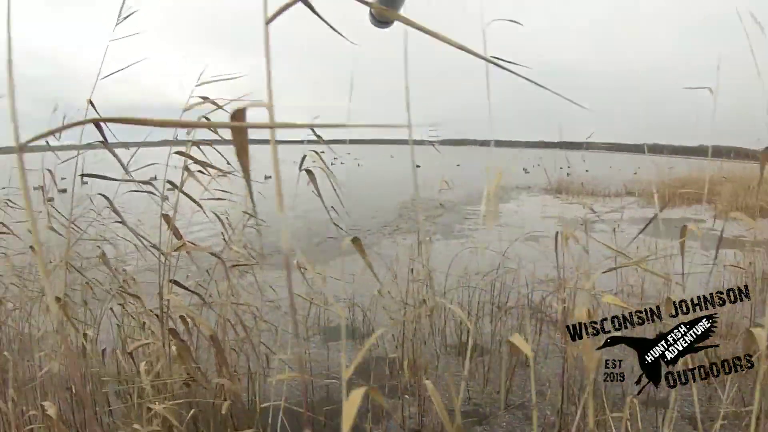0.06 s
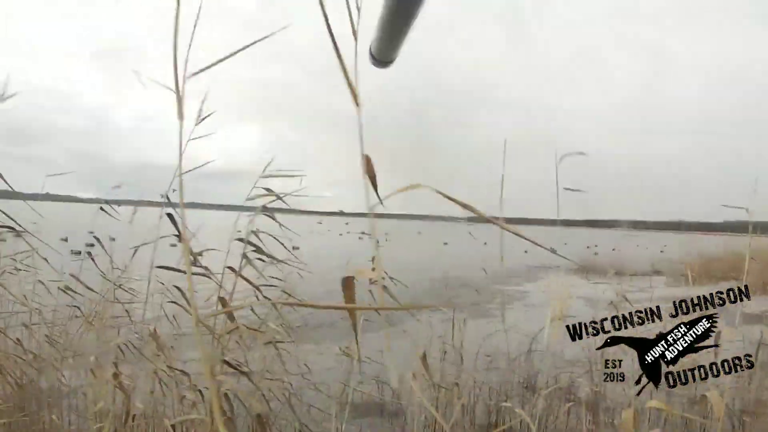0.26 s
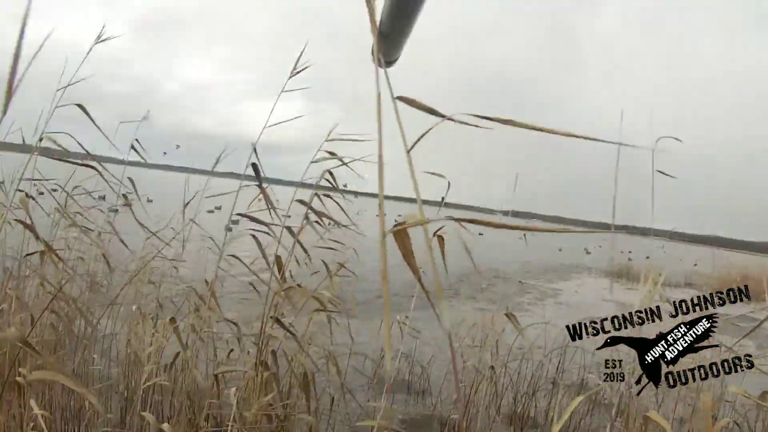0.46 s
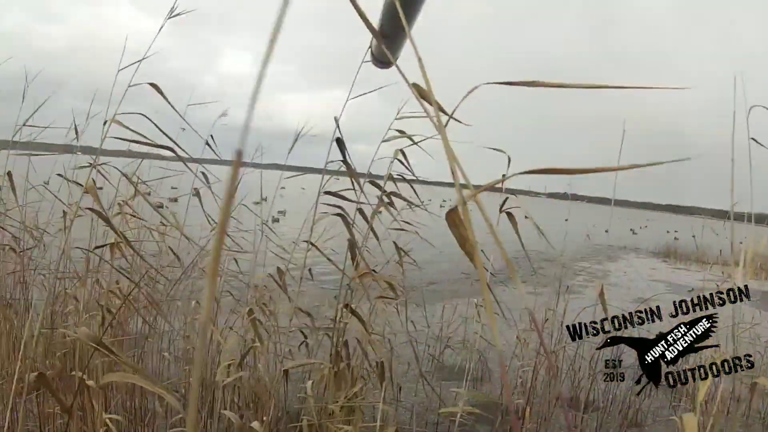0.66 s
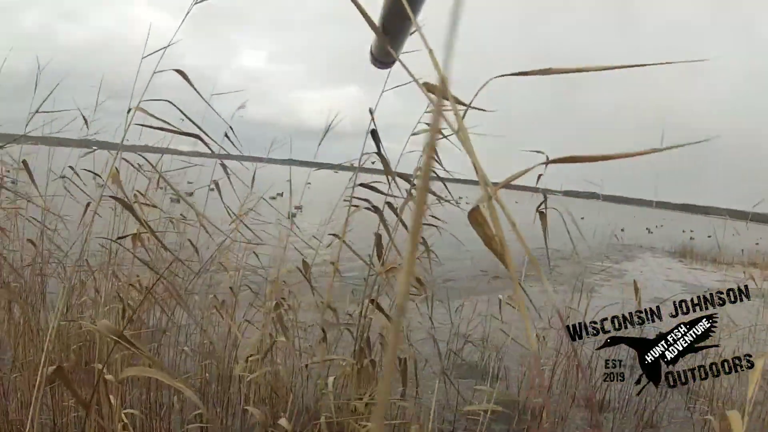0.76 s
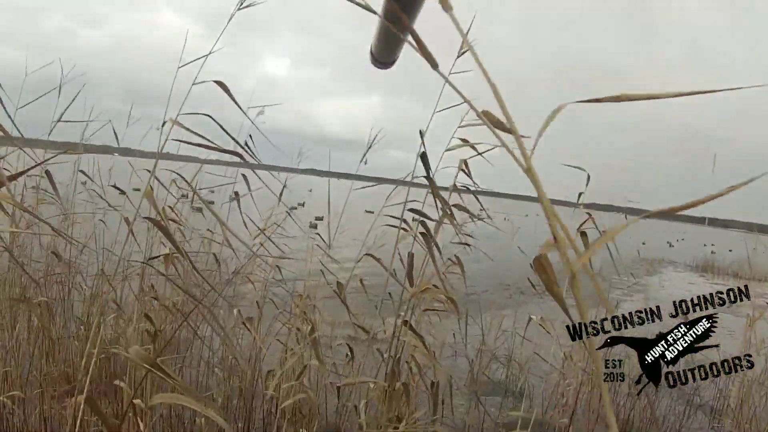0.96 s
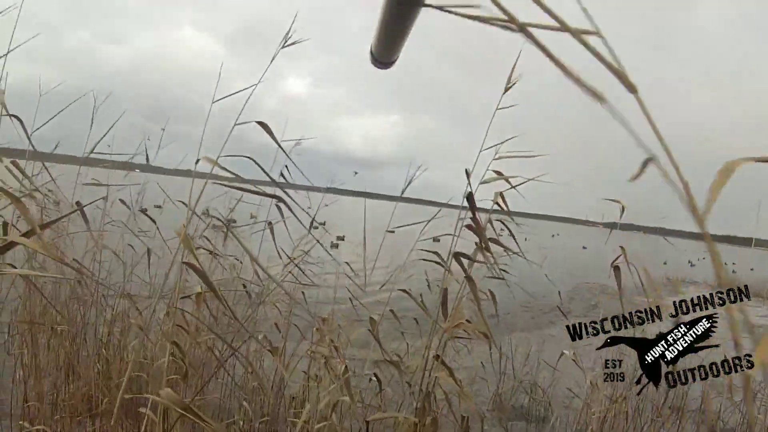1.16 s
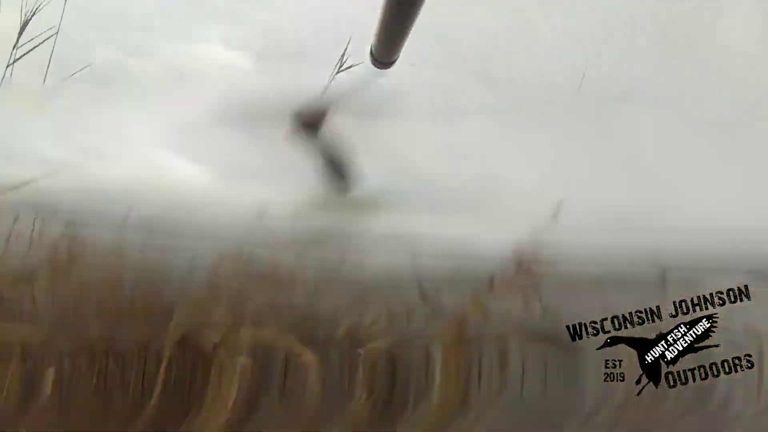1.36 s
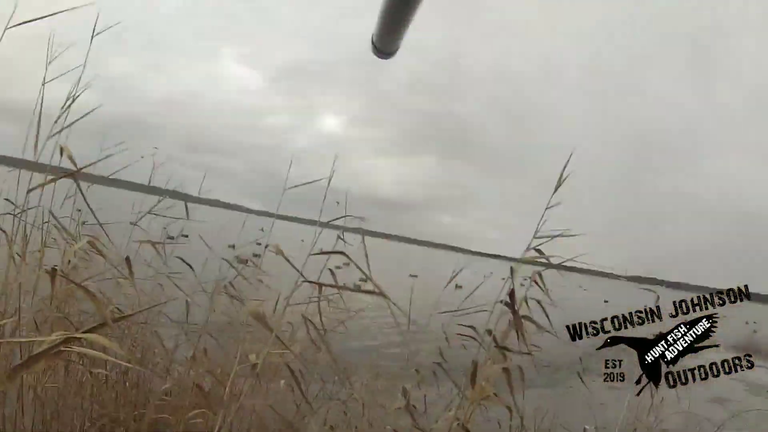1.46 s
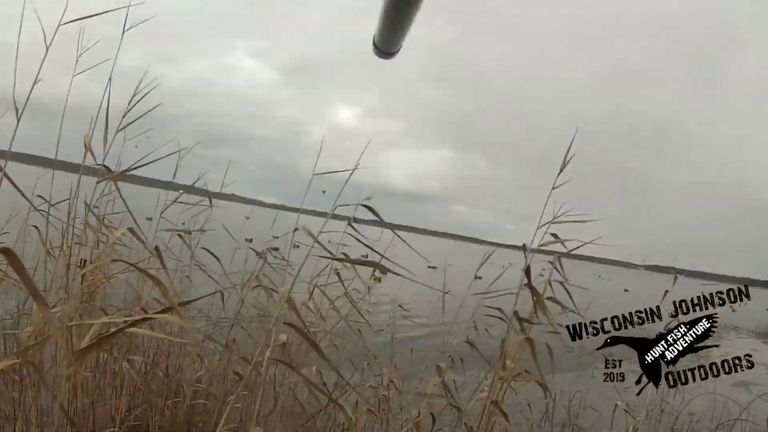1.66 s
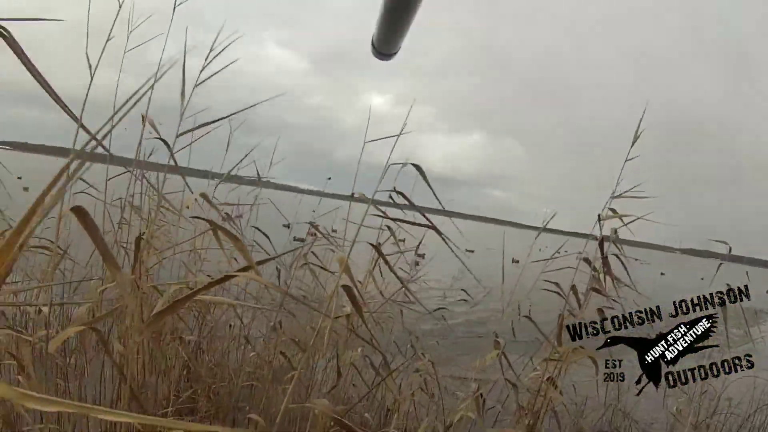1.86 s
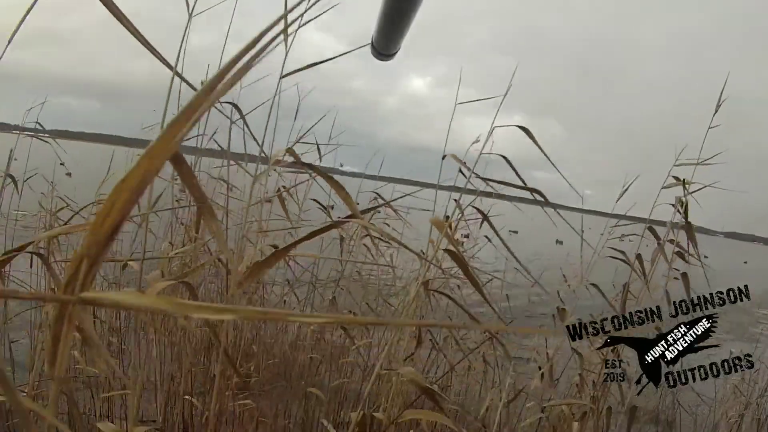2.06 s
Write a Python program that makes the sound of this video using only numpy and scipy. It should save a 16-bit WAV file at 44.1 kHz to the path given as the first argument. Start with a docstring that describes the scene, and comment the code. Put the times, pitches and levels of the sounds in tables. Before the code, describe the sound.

Close on a pump-action shotgun outdoors: the slide clacks back at 0.2 seconds and slams shut at 0.4. Shell-loading knocks follow at 0.6 and 0.7, then small ticks and brassy chinks from 0.8 to 1.2 amid rustling sleeves and dry reeds. A hard blow at 1.4 starts the second racking, shutting around 1.65; a hollow metal hum and faint spring buzz fade. Dull handling rumble, slightly clipped peaks.

```python
"""Steel contacts of a pump-action long gun: slide racked back and slammed shut, shells thumbed in with
knocks and small ticks, then racked again. Contacts are noise bursts ringing steel, stock and air.
Tube and barrel hum on as decaying sines, with a spring buzz of filtered noise; brass shell bases chink.
Cloth and dry reeds rustle as grainy noise, rumbling through the camera clamped to the gun; its input clips."""
import sys
import numpy as np
from scipy import signal
from scipy.fft import rfft, irfft, next_fast_len
from scipy.io import wavfile
from scipy.ndimage import map_coordinates

SR = 44100
rng = np.random.default_rng(int(sys.argv[2]) if len(sys.argv) > 2 else 0)


def voltage_ratio(level):
    """Linear amplitude factor for a level in decibels (scalar or array-like)."""
    return 10 ** (np.asarray(level, float) / 20)


def persist_wave(psi):
    """Save psi, clipped to +-1, as 16-bit WAV."""
    counts = np.round(np.clip(psi, -1, 1) * 32767).astype(np.int16)
    wavfile.write(sys.argv[1], SR, np.atleast_2d(counts).T)


N = 92610


def unit(x):
    """Scaled to rms 1."""
    return x / np.sqrt(np.mean(x ** 2) + 1e-20)


def along(points, hz):
    """(f/Hz, value) points interpolated on a log frequency axis."""
    f, v = np.transpose(points)
    return np.interp(np.log(hz + 1), np.log(f + 1), v)


def wobble(knots_per_s):
    """Smooth random curve: spline through normal knots."""
    return map_coordinates(rng.standard_normal(N // 50), [np.arange(N) * knots_per_s / SR])


def filtered(x, response):
    """x through a frequency response scaled to mean power 1."""
    m = next_fast_len(len(x) + 8192)
    gain = response(np.fft.rfftfreq(m, 1 / SR))
    gain = gain / np.sqrt(np.mean(abs(gain) ** 2))
    return irfft(rfft(x, m) * gain, m)[:len(x)]


def resonances(peaks):
    """Causal response: sum of (f/Hz, width/Hz, level/dB) resonances, alternating in sign."""
    def response(hz):
        total = 0
        for k, (centre, width, db) in enumerate(peaks):
            damping = 1j * hz * width
            total = total + (-1) ** k * voltage_ratio(db) * damping / (centre ** 2 - hz ** 2 + damping)
        return total
    return response


def burst(shape, response):
    """Noise under an envelope rings through a response and keeps the envelope's energy."""
    noise = shape * rng.standard_normal(len(shape))
    return unit(filtered(noise, response)) * np.sqrt(np.mean(shape ** 2))


def add(track, s, sound):
    """Mixes a sound in at s seconds."""
    part = track[round(s * SR):][:len(sound)]
    part += sound[:len(part)]


# rustle spectrum in air: f/Hz, density/dB per Hz (relative)
RUSTLE_SPECTRUM = [(900, -18), (1500, -1), (3900, -2.5), (7000, -10), (8300, -22), (10000, -12.5),
                   (15500, -30.5)]
# rumble spectrum through the housing: f/Hz, density/dB per Hz (relative)
HOUSING_SPECTRUM = [(20, -8), (91, -18), (240, -11), (600, -3.5), (1050, -14), (1600, -33), (3000, -89.5)]
# rustle strength: t/s, level/dB
RUSTLE_LEVELS = [(0, -46.5), (.19, -56.5), (.27, -46.5), (.44, -52), (.57, -70.5), (.6, -49), (.74, -45.5),
                 (.96, -45), (1.03, -61), (1.055, -47.5), (1.09, -37), (1.145, -44.5), (1.2, -61),
                 (1.38, -67), (1.42, -44.5), (1.53, -50.5), (1.61, -45), (1.75, -57), (1.9, -65.5),
                 (2.1, -71.5)]
# rumble strength: t/s, level/dB
RUMBLE_LEVELS = [(0, -37.5), (.18, -45.5), (.33, -40.5), (.45, -58), (.64, -44), (.82, -36.5), (1.03, -45),
                 (1.36, -53), (1.57, -39.5), (1.72, -50), (2.1, -54.5)]
GRAINS_PER_S, GRAIN_MAX_DB, GRAIN_DECAY_S = 130, 16, 0.003
WAVER_KNOTS_PER_S, FLUTTER_DB = 55, 1.5


def rubbing():
    """Sleeves, hands and stems rub: grainy rustle in the air, dull rumble through the housing."""
    t = np.arange(N) / SR
    sparks = (rng.random(N) < GRAINS_PER_S / SR) * voltage_ratio(GRAIN_MAX_DB * rng.random(N) ** 2)
    grains = 1.6 + np.convolve(sparks, np.exp(-t[:500] / GRAIN_DECAY_S))[:N]
    rustle_noise = grains * rng.standard_normal(N)
    rumble_noise = np.sqrt(grains) * rng.standard_normal(N)
    rustle = unit(filtered(rustle_noise, lambda hz: voltage_ratio(along(RUSTLE_SPECTRUM, hz))))
    rumble = unit(filtered(rumble_noise, lambda hz: voltage_ratio(along(HOUSING_SPECTRUM, hz))))
    rustle_db = np.interp(t, *np.transpose(RUSTLE_LEVELS)) + FLUTTER_DB * wobble(WAVER_KNOTS_PER_S)
    rumble_db = np.interp(t, *np.transpose(RUMBLE_LEVELS)) + FLUTTER_DB * wobble(WAVER_KNOTS_PER_S)
    return voltage_ratio(rustle_db) * rustle + voltage_ratio(rumble_db) * rumble


# shell base modes: f/Hz, level/dB (re chink), t60/s
BRASS_MODES = [(2640, -25, .09), (3850, 0, .025), (5700, -19, .09), (6440, -17, .08)]
# chinks: t/s, level/dB, tilt/dB per octave about 4 kHz
SHELL_CHINKS = [(1.157, -26.5, 17), (1.227, -26, -14)]


def shells():
    """A shell's brass base rings briefly: decaying sines."""
    out, t = np.zeros(N), np.arange(SR // 6) / SR
    for s, chink_db, tilt_db in SHELL_CHINKS:
        for hz, mode_db, t60 in BRASS_MODES:
            level_db = chink_db + mode_db + tilt_db * np.log2(hz / 4000) - 60 * t / t60
            add(out, s, voltage_ratio(level_db) * np.sin(2 * np.pi * hz * t))
    return out


# long modes of tube, spring and barrel: f/Hz
MODE_HZ = [39, 100, 361, 583, 705, 802, 993]
# the same modes, row for row: level action open/dB, level action shut/dB (both re stroke), t60/s
MODE_LEVELS = [(-61.5, -34.5, 1.6), (-54.5, -52, 0.63), (-67, -49, 1), (-52, -49, 2.7), (-41, -27.5, 0.75),
               (-51, -32, 0.68), (-46.5, -36.5, 0.84)]
# stroke ends: t/s, action (0 open, 1 shut), time until damped/s, hum level/dB
STROKE_ENDS = [(.24, 0, .13, 18), (.412, 1, 0.2, 5), (1.49, 0, 0.2, 18), (1.667, 1, 2, 2.5)]
# spring resonances: f/Hz, width/Hz, level/dB
SPRING_PEAKS = [(2130, 200, 0), (3200, 450, -4)]
# spring buzz, action open then shut: level/dB
BUZZ_LEVELS = [-46, -54]
BUZZ_T60_S, SWELL_S = 1, 0.068
WAVER_DB, DRIFT_S = 3.2, 1.1e-4  # random level and timing unsteadiness


def tube():
    """After each stroke end the long modes swell and hum unsteadily and the spring buzzes, until damped."""
    hum, t = np.zeros(N), np.arange(SR // 2) / SR
    spring = resonances(SPRING_PEAKS)

    def waver():
        return wobble(WAVER_KNOTS_PER_S)[:len(t)]

    for s, shut, damped_s, stroke_db in STROKE_ENDS:
        ringing = t < damped_s
        swell = (1 - np.exp(-t / SWELL_S)) ** 2
        for hz, (open_db, shut_db, t60) in zip(MODE_HZ, MODE_LEVELS):
            level_db = stroke_db + (shut_db if shut else open_db) - 60 * t / t60
            if hz > 50:
                level_db = level_db + WAVER_DB * waver()
            cycles = hz * t + rng.random() + hz * DRIFT_S * waver()
            add(hum, s, ringing * swell * voltage_ratio(level_db) * np.sin(2 * np.pi * cycles))
        buzz = unit(filtered(filtered(rng.standard_normal(len(t)), spring), spring))
        buzz_db = BUZZ_LEVELS[shut] - 60 * t / BUZZ_T60_S + WAVER_DB * waver()
        add(hum, s, ringing * voltage_ratio(buzz_db) * buzz)
    return hum


# steel resonances: f/Hz, width/Hz, level/dB
STEEL_PEAKS = [(1670, 770, 9), (2367, 560, 10), (2743, 566, 14.5), (3260, 1610, 7.5)]
RISE_S, TAIL_DB, TAIL_T60_S = 0.0006, -28, 0.11
CLACK_REF_DB, THUD_REF_DB, SIZZLE_REF_DB = -9.5, 1, -2  # 0 dB of the contact tables' level columns
THUD_T60_RATIO, CHATTER_DB, CHATTER_KNOTS_PER_S = 1.46, 1.2, 350
SPOT_SHIFT = 0.04  # sd of log frequency shift, per contact spot


def contact(out, s, clack_db, thud_db, sizzle_db, t60, hold_s, body, treble):
    """A short chatter with a faint tail drives steel (clack), body (thud) and treble (sizzle)."""
    t = np.arange(SR // 8) / SR
    late = np.maximum(t - hold_s, 0)
    chatter = voltage_ratio(CHATTER_DB * wobble(CHATTER_KNOTS_PER_S)[:len(t)])
    onset = chatter * (1 - np.exp(-t / RISE_S))
    tail = voltage_ratio(TAIL_DB - 60 * late / TAIL_T60_S)
    shape = onset * (voltage_ratio(-60 * late / t60) + tail)
    thud_shape = onset * (voltage_ratio(-60 * late / (THUD_T60_RATIO * t60)) + tail)
    steel_shift, body_shift = np.exp(SPOT_SHIFT * rng.standard_normal(2))

    def steel_response(hz):
        band = 1 / (1 + 1j * hz / 4000) * hz / (hz - 900j)  # low-pass 4 kHz, high-pass 900 Hz
        return resonances(STEEL_PEAKS)(steel_shift * hz) * band

    clack = burst(shape, steel_response)
    thud = burst(thud_shape, lambda hz: body(body_shift * hz) / (1 + 1j * hz / 1500))
    sizzle = burst(shape, lambda hz: treble(steel_shift * hz))
    add(out, s - RISE_S, voltage_ratio(clack_db + CLACK_REF_DB) * clack)
    add(out, s - RISE_S, voltage_ratio(thud_db + THUD_REF_DB) * thud)
    add(out, s - RISE_S, voltage_ratio(sizzle_db + SIZZLE_REF_DB) * sizzle)


PUSH_S = 0.0016


def push(out, s, db):
    """The blow shoves the housing once: a negative pulse with a slow rebound."""
    t = np.arange(SR // 8) / SR
    add(out, s, -voltage_ratio(db) * (1 - t / PUSH_S) * np.exp(-t / PUSH_S))


# sizzle spectrum in air: f/Hz, density/dB per Hz (relative)
SIZZLE_SPECTRUM = [(2350, -12), (4000, -1), (5410, -0.5), (8160, -9.5), (10600, -9.5), (14600, -17.5),
                   (16000, -43.5)]


def air(hz):
    """Broad treble radiated straight into the air."""
    return voltage_ratio(along(SIZZLE_SPECTRUM, hz))


# receiver resonances: f/Hz, width/Hz, level/dB
RECEIVER_PEAKS = [(692, 215, 7), (1143, 392, 0.5), (345, 233.6, -13.5)]
# brittle ring of a tick: f/Hz, width/Hz, level/dB
SNAP_PEAKS = [(3550, 450, 1), (6600, 680, -1.5), (11200, 1700, -11.5)]
# light ticks: t/s, clack/dB, thud/dB, sizzle/dB
LIGHT_TICKS = [(0.0292, -28, -37.5, -33), (0.1958, -18, -22.5, -40), (0.2784, -28, -62, -66),
               (0.796, -34, -62, -45.5), (0.838, -35, -32.5, -51.5), (0.8617, -34, -53, -46),
               (0.905, -37.5, -34, -38), (1.084, -36, -43.5, -31.5), (0.9393, -21, -31, -14.5),
               (0.9703, -21.5, -32.5, -19), (1.016, -55.5, -77, -38.5), (1.1266, -29.5, -35, -25),
               (1.1555, -25, -40, -14), (1.1534, -25, -29.5, -15), (1.2262, -26, -33, -39.5),
               (1.4881, -27.5, -21, -41), (1.503, -26, -47, -38), (1.953, -58, -62, -56.5),
               (2.029, -70, -74, -55.5)]
TICK_T60_S, TICK_HOLD_S = 0.028, 0.002


def ticks():
    """Shells and reed stems tick lightly: brittle treble, no push on the housing."""
    out = np.zeros(N)
    body, snap = resonances(RECEIVER_PEAKS), resonances(SNAP_PEAKS)
    for s, clack_db, thud_db, sizzle_db in LIGHT_TICKS:
        contact(out, s, clack_db, thud_db, sizzle_db, TICK_T60_S, TICK_HOLD_S, body, snap)
    return out


# wooden stock beside its knock: f/Hz, width/Hz, level/dB
BUTT_PEAKS = [(291, 230, -8.5), (649.4, 400, -8.5)]
# heavy blows: t/s, clack/dB, thud/dB, sizzle/dB, t60/s (clack, sizzle), knock f/Hz
HEAVY_JOLTS = [(0.2005, 8.5, -9.5, -3, 0.022, 371), (0.5875, 3, -5, -2.5, 0.016, 443),
               (0.7065, -1, -10.5, -6, 0.03, 645), (1.3971, 7, 0, -3.5, 0.014, 438)]
KNOCK_WIDTH_HZ, JOLT_HOLD_S, JOLT_PUSH_DB = 65, 0.002, 4  # push re thud column


def jolts():
    """Heavy blows jolt the whole stock, which knocks at a narrow resonance."""
    out = np.zeros(N)
    for s, clack_db, thud_db, sizzle_db, t60, knock_hz in HEAVY_JOLTS:
        body = resonances([(knock_hz, KNOCK_WIDTH_HZ, 0)] + list(BUTT_PEAKS))
        contact(out, s, clack_db, thud_db, sizzle_db, t60, JOLT_HOLD_S, body, air)
        push(out, s, thud_db + JOLT_PUSH_DB)
    return out


# contacts of steel parts: t/s, clack/dB, thud/dB, sizzle/dB, t60/s (clack, sizzle)
STEEL_KNOCKS = [(0.2132, -19, -18.5, -18.5, 0.032), (0.2245, -8.5, -18, -22.5, 0.073),
                (0.3673, 0, -11.5, -41.5, 0.011), (0.3746, -5, -23, -26.5, 0.021),
                (0.384, -3.5, -15.5, -23.5, 0.033), (0.3915, -19, -19.5, -25.5, 0.053),
                (0.398, 7, -12.5, -7.5, 0.018), (0.4062, 2, -7, -16.5, 0.01),
                (1.4405, 0.5, -15.5, -11, 0.035), (1.452, -5.5, -15, -15.5, 0.023),
                (1.465, -6.5, -17.5, -20, 0.053), (1.6229, -6, -14, -36.5, 0.035),
                (1.6305, -8, -14.5, -28, 0.036), (1.6395, 0, -22, -25, 0.015),
                (1.6475, -8.5, -10, -18.5, 0.01), (1.6533, 9.5, -5, -9, 0.023),
                (1.6616, -0.5, -10, -17.5, 0.016)]
KNOCK_HOLD_S, KNOCK_PUSH_DB = 0.0011, -7  # push re thud column


def knocks():
    """Steel parts of the action strike each other and ring steel, receiver and air."""
    out = np.zeros(N)
    body = resonances(RECEIVER_PEAKS)
    for s, clack_db, thud_db, sizzle_db, t60 in STEEL_KNOCKS:
        contact(out, s, clack_db, thud_db, sizzle_db, t60, KNOCK_HOLD_S, body, air)
        push(out, s, thud_db + KNOCK_PUSH_DB)
    return out


def scene():
    """All sources, mono."""
    return (rubbing() + shells() + tube() + ticks() + jolts() + knocks())[None]


def low_pass(x):
    """Removes everything above the highest recorded frequency."""
    return signal.sosfilt(signal.butter(12, 16530, fs=SR, output="sos"), x)


def record(dry):
    """The input clips smoothly at full scale; nothing passes above the band limit."""
    top_hz = 15600
    clipped = dry[0] / (1 + abs(dry[0]) ** 6) ** (1 / 6)
    limited = filtered(clipped, lambda hz: np.where(hz < top_hz, 1., 0))
    mix = limited * np.sqrt(2 * top_hz / SR)  # passband gain back to 1
    return low_pass(mix[None])


dry = scene()
out = record(dry)
persist_wave(out)
```